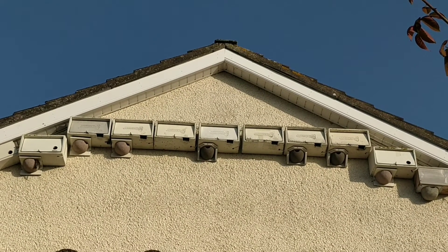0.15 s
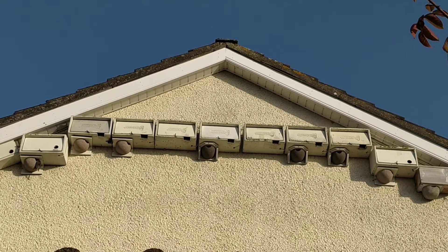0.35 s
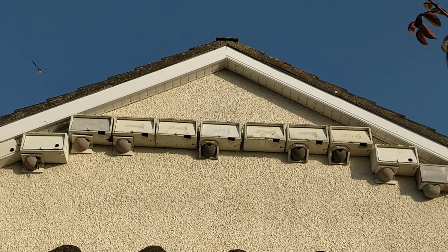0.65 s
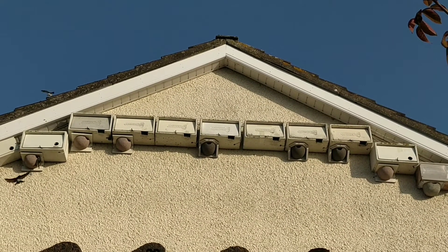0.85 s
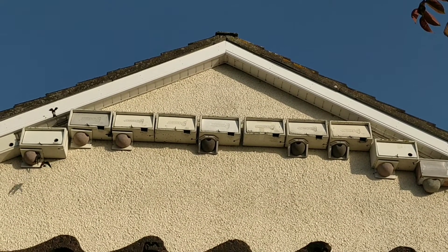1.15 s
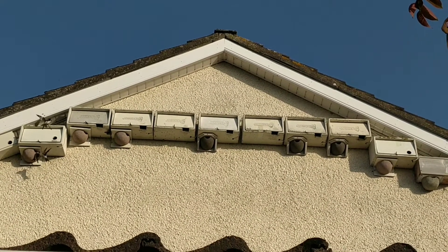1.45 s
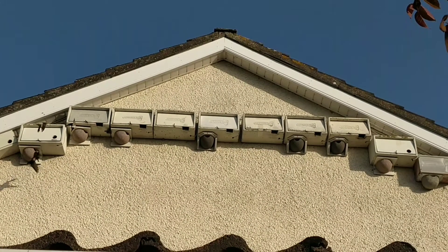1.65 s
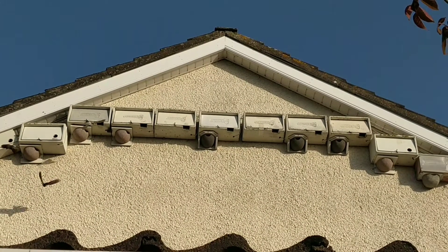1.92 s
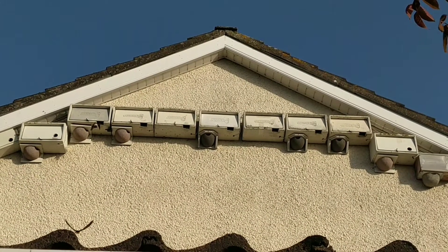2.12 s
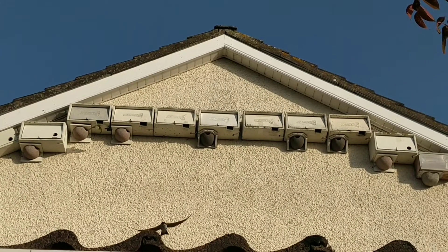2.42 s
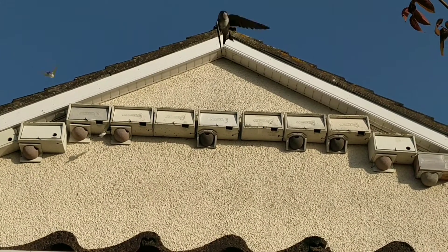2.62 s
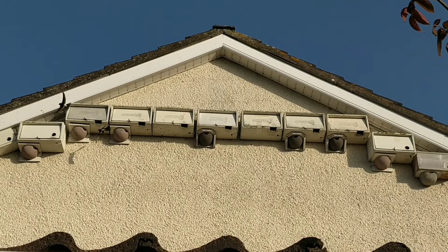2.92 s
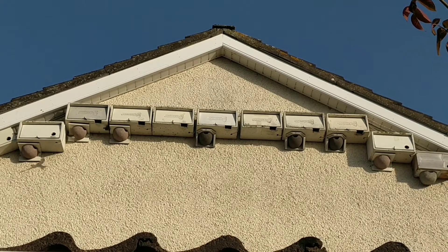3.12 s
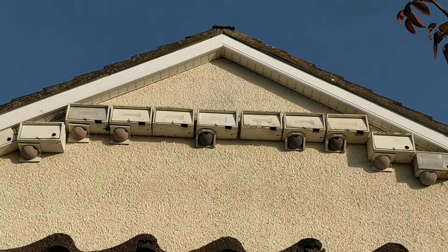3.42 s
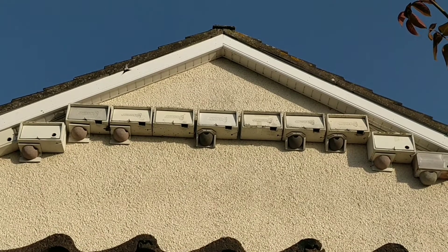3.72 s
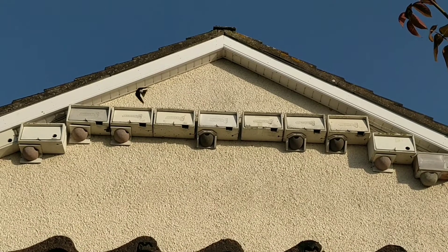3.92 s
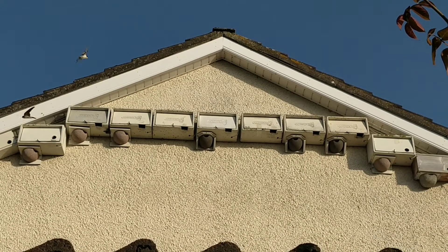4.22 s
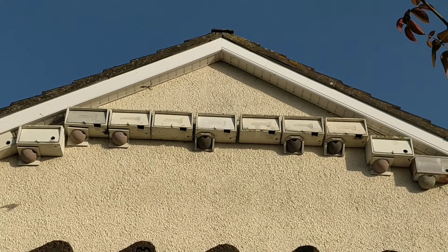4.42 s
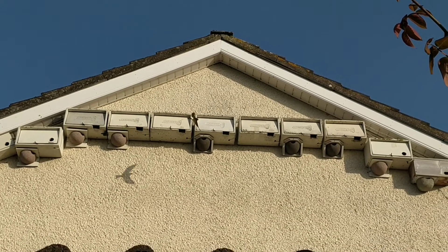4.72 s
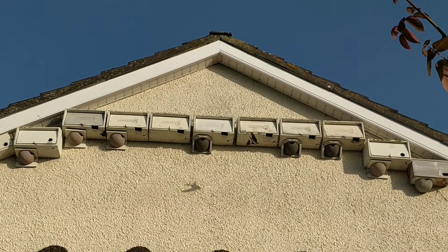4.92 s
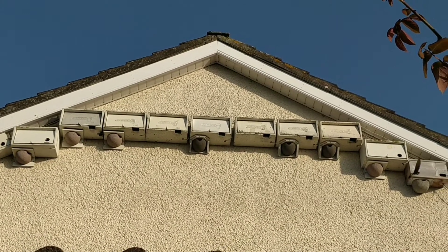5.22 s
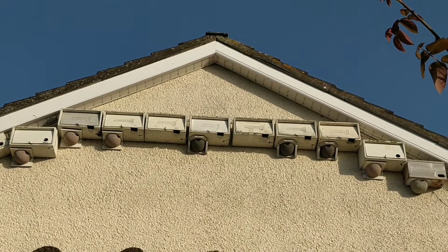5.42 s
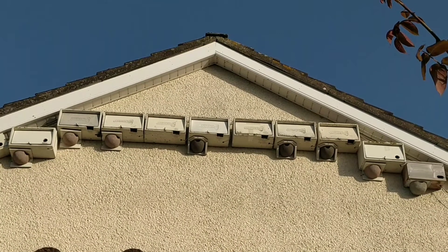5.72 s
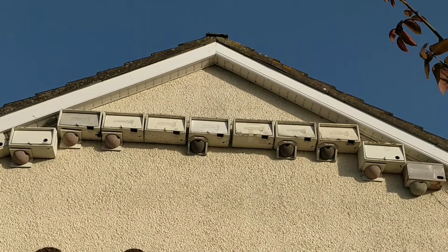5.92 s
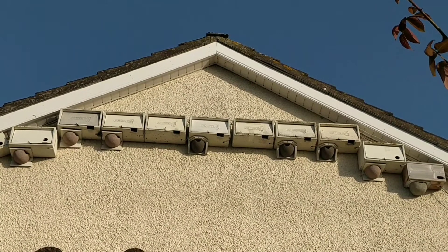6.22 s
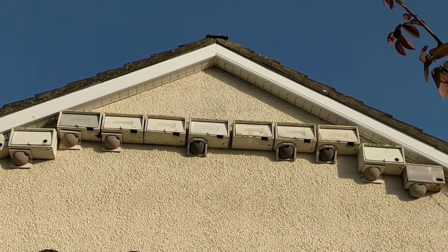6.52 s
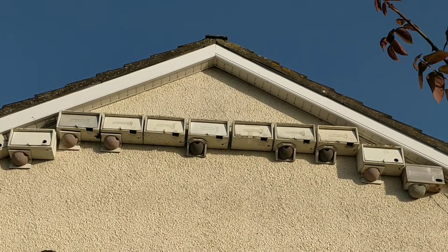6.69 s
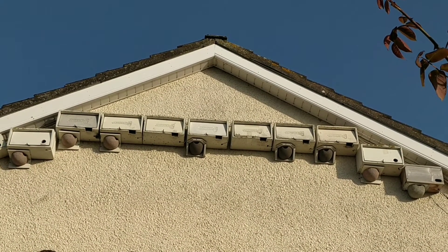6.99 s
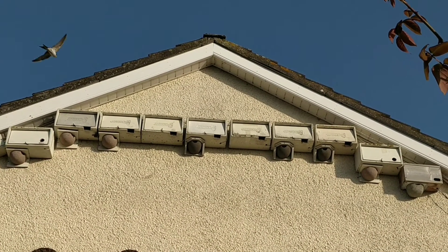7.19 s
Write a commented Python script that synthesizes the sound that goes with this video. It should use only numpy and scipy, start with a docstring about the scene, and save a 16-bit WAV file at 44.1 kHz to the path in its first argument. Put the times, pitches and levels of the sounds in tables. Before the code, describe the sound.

A house wall with nest boxes under the eaves, heard outdoors in stereo from a moderate distance, with short reflections from soffit, roof and yard. From 0 s martins give dry, rattling twitters: fast gritty chirps sweeping up from about 2.5 to 5 kHz, in pairs or small groups roughly 20 ms apart. Activity softens around 0.45-0.7 s and 1.0-1.25 s, then becomes dense and loud from 1.3 to 2.55 s. A quieter, rougher rattle runs about 2.75-3.27 s, with a brighter burst near 3.3-3.4 s. Strong pairs return from 3.77 to 5.0 s. Calls then weaken and scatter until 6.5 s, with a pause and a few faint chirps after 7.1 s. From about 5.4 s come very faint distant whistles, thin high lisps and low hoarse calls. Low traffic rumble persists, its tyre roar swelling slightly near 3.4 s, with a faint unsteady engine drone.

```python
"""House martins twitter round their nest boxes under the eaves: calls of one to three fast upward sweeps
about 22 ms apart, each a gliding tone with overtones and roughness, echoed by soffit, roof and yard.
A small bird lisps high up and farther birds call now and then, all as gliding near-sine notes.
Behind them distant traffic rumbles as coloured noise, and a far engine drones as a wavering sine."""
import sys
import numpy as np
from scipy import signal
from scipy.fft import rfft, irfft
from scipy.io import wavfile
from scipy.ndimage import uniform_filter1d

SR = 44100
rng = np.random.default_rng(int(sys.argv[2]) if len(sys.argv) > 2 else 0)


def store_wav(level_fs):
    """Save 16-bit WAV to argv[1]."""
    pcm = np.round(np.clip(np.atleast_2d(level_fs), -1, 1) * 32767)
    wavfile.write(sys.argv[1], SR, pcm.T.astype(np.int16))


N = 324115
TIME = np.arange(N) / SR
LEFT_RIGHT = np.array([[1], [-1]]) / 2  # shares a difference equally between the two ports
YARD_T60_S = 0.35

# lags of the first echoes; the wall and roof lags vary at random from sweep to sweep
SOFFIT_S = .003
WALL_S, WALL_RANGE_S = .000784, .001
ROOF_S, ROOF_RANGE_S = .013, .012
# treble gained while an open beak points at the microphone, or lost as the bird turns away:
# (time [s], gain reached at 13 kHz [dB])
BEAK_FACING = [(0, -0.5), (1.5, 0.5), (2.4, -1.5), (2.53, 8), (2.96, 3), (3.01, -4), (3.26, -4),
               (3.28, 20.5), (3.40, 16), (3.45, 0), (3.76, 4.5), (4.45, 4), (4.7, 5), (4.9, 2), (5.3, -6),
               (7.35, -10)]
# notches cut by a surface close to the microphone: (frequency [Hz], gain [dB])
SURFACE_NOTCHES = [(2100, 0), (2520, 2), (2820, -10.5), (3200, 4), (3490, -5.5), (3780, 3.5), (4060, -8.5),
                   (4340, -1), (4750, 0.5), (5200, -1), (5600, 3.5), (6100, -1.5), (6500, 2)]
# tint of the yard's echoes: (frequency [Hz], gain [dB])
YARD_TINT = [(2300, 6.0), (3700, 3.5), (4600, 2.0), (5400, -2.5), (7000, 5.5), (12000, 4.0)]


def martins(near_db=-35, fade_db=18, soffit_db=-14, wall_db=-15, roof_db=-14, yard_db=-7.5,
            far_loss_db=2.5, far_echo_db=2.5, aside_ms=.05, count=3):
    """Direct-to-reverberant ratio: faint birds and those off to the side arrive more as echo."""
    direct = np.zeros((2, N))
    sends = np.zeros((count, 2, N))
    place = 0
    for s, voice, db, lag_ms, opens in syllables():
        # successive calls take turns among a few places on the wall
        place = (place + int(opens)) % count
        roof_chance, wall_chance = rng.random(2)
        heard = at_ports(voice, lag_ms) * undb(db)
        far = np.clip((near_db - db) / fade_db, 0, 1) + (lag_ms < aside_ms)
        # only the treble is beamed, and the echoes do without this change
        treble_db = np.interp(s, *np.transpose(BEAK_FACING))
        beamed = colour(heard, [(5800, 0), (13000, treble_db)])
        add(direct, beamed * undb(-far_loss_db * far), s)
        add(direct, heard * undb(soffit_db), s + SOFFIT_S)
        # the wall just behind the bird answers sooner and breaks up the sweep
        add(direct, heard * undb(wall_db), s + WALL_S + WALL_RANGE_S * wall_chance)
        # the roof in front returns a distinct copy
        add(direct, heard * undb(roof_db), s + ROOF_S + ROOF_RANGE_S * roof_chance)
        # the yard's echoes reach both ports unshaded
        unshaded = at_ports(voice, lag_ms, shade_db_per_ms=0)
        add(sends[place], unshaded * undb(db + far_echo_db * far), s)
    echo = sum(yard(send, YARD_T60_S, spread=0.81) for send in sends)
    return colour(direct, SURFACE_NOTCHES) + undb(yard_db) * colour(echo, YARD_TINT)


# a syllable opens a new call after a pause longer than this, or if its foot is below this pitch
PAUSE_S, OPENING_FOOT_HZ = .03, 2650
# martin sweeps: (time at the top [s], level before losses and echoes [dB], top pitch [Hz], foot pitch [Hz],
# length of the climb [ms], rasp before offsets [dB], strength of the low climb [dB], lead of the left port [ms])
MARTIN_SWEEPS = [(0.008, -37.5, 5280, 2930, 4.9, -28, -4, 0.091),
                 (0.07, -33.5, 5270, 2587, 6.1, -28, -8.5, 0.098),
                 (0.091, -33.5, 5140, 2795, 7.5, -38, -7, 0.11),
                 (0.1768, -51, 5300, 2770, 4.6, -24, -2, 0.093),
                 (0.1925, -52, 5070, 2790, 8.1, -26, -7, 0.11),
                 (0.2205, -40, 4970, 1943, 6.8, -16, 9, 0.091),
                 (0.2416, -35, 5200, 2836, 6.5, -29, -3, 0.1),
                 (0.308, -38, 5280, 2970, 5.5, -26, 10, 0.091), (0.3304, -38, 5110, 2830, 5.1, -26, 3, 0.1),
                 (0.4496, -51, 4960, 2520, 5.8, -21, 3, 0.08), (0.472, -50.5, 5200, 2836, 7, -16, 3, 0.1),
                 (0.583, -57.0, 5420, 2790, 6.8, -34, -14, 0.094),
                 (0.602, -53, 5310, 2380, 4.9, -22, -6, 0.1),
                 (0.6625, -53, 5260, 2380, 4.1, -28, -8, 0.098),
                 (0.682, -52.5, 5320, 2770, 7.9, -26, -7.5, 0.11),
                 (0.82, -41.5, 5240, 2390, 5.7, -25, -11, 0.11),
                 (0.8431, -42.5, 5100, 2843, 7.9, -26, -3, 0.12),
                 (0.9107, -45.5, 5300, 2970, 5.2, -33, -3, 0.097),
                 (0.932, -41, 5040, 2785, 6.8, -27, -3, 0.11),
                 (0.9938, -57.5, 5260, 2820, 5.5, -12, -14, 0.14),
                 (1.02, -68, 4870, 2800, 7, -20, -11, 0.086), (1.1197, -58, 4630, 3020, 4.8, -10, 18, 0.1),
                 (1.141, -64, 5400, 2800, 6, -4, 7, 0.12), (1.2362, -57, 4800, 2680, 5.9, -21, 3, 0.11),
                 (1.26, -55.5, 5160, 2800, 6.3, -8, -14, 0.12),
                 (1.312, -47, 4780, 2090, 3.7, -20, 2, 0.093),
                 (1.325, -36, 5130, 2444, 6.3, -29, -9, 0.096), (1.337, -39, 5030, 3000, 4.1, -20, 0, 0.11),
                 (1.3447, -37, 5190, 2770, 6.1, -22, -0.5, 0.094),
                 (1.358, -41.5, 4720, 3120, 5.3, -21, 10, 0.1),
                 (1.381, -38.5, 5090, 2720, 6.2, -26, 6, 0.11),
                 (1.4025, -37.5, 5160, 2840, 6, -18, 18, 0.11),
                 (1.4651, -39, 4500, 1894, 5.5, -16, 15, 0.1),
                 (1.4859, -38.5, 4900, 2588, 5.5, -20, 9, 0.13),
                 (1.4904, -36.5, 5370, 2807, 6.1, -25, -7, 0.1),
                 (1.5105, -37.5, 5130, 2780, 6.3, -22, 1, 0.11),
                 (1.583, -33.5, 5260, 2480, 5.8, -16, -1.5, 0.1),
                 (1.6012, -31, 5390, 2820, 5.1, -19.5, 2.5, 0.11),
                 (1.665, -33.0, 5450, 2480, 5.6, -27, -12, 0.11),
                 (1.6857, -34, 5330, 2786, 5.4, -21, -17, 0.11),
                 (1.704, -44.5, 5300, 2820, 5.7, -5, 10, 0.11),
                 (1.783, -37.5, 5240, 2160, 5, -25, -11, 0.11),
                 (1.8037, -36, 5350, 2794, 6.2, -22, -10, 0.11),
                 (1.8415, -47, 5230, 3100, 5.1, -13, 5, 0.11),
                 (1.864, -48.5, 5320, 2810, 8.3, -17, -2, 0.1),
                 (1.8878, -47, 5400, 2820, 8.2, -20, -10, 0.108),
                 (1.9049, -35.5, 5170, 2480, 6.1, -33, -6.5, 0.1),
                 (1.927, -34, 5150, 2760, 5.5, -30, -2.5, 0.11),
                 (1.955, -39.5, 5350, 3100, 6.4, -23, -18, 0.11),
                 (1.9804, -40, 5220, 2820, 7.7, -35, -9, 0.11),
                 (1.995, -37.5, 5330, 2873, 6.3, -22, 8, 0.11),
                 (2.0172, -35, 5180, 2815, 6.46, -31, 0, 0.097),
                 (2.058, -35, 5320, 2710, 5.5, -21, -10, 0.11),
                 (2.0847, -33.5, 5380, 2800, 7.4, -26, -9, 0.11),
                 (2.153, -32.5, 5380, 2487, 5.7, -29, -18.5, 0.11),
                 (2.173, -31, 5340, 2780, 7.2, -23, -9, 0.11),
                 (2.2563, -36, 5010, 2492, 5.8, -29, -2, 0.095),
                 (2.277, -36, 5270, 2770, 7.9, -22.5, 2, 0.086),
                 (2.3433, -36, 5240, 2897, 4.8, -24, 6, 0.1),
                 (2.3664, -36.5, 5180, 2803, 6.9, -19.5, 0.5, 0.11),
                 (2.393, -44, 5180, 2820, 6.8, -21.5, -10, 0.108),
                 (2.52, -32, 5350, 2193, 7, -28.5, -19, 0.11),
                 (2.5394, -31, 5310, 2820, 6.3, -27, -17, 0.11),
                 (2.76, -46, 5190, 2614, 4.4, -17.5, 4.5, 0.1),
                 (2.779, -48.5, 5270, 2790, 8.1, -11, 1, 0.12),
                 (2.862, -44.5, 5550, 2700, 4.5, -18, 4, 0.11), (2.883, -44, 4630, 2400, 4.8, -7, 14, 0.12),
                 (2.904, -50, 4650, 3120, 8.3, -1, -5, 0.11),
                 (2.9225, -47.5, 5090, 2775, 5.8, -1, -4, 0.11),
                 (2.9423, -52, 5500, 2800, 6.2, -6, -10, 0.11), (2.954, -59, 5270, 2790, 6, -6, -12, 0.11),
                 (3.0224, -48.5, 5120, 3500, 4.1, -19, -6, 0.015),
                 (3.0426, -43, 5050, 3700, 7.1, -17, -6, 0.015),
                 (3.0652, -42.5, 4920, 3700, 7.7, -21, -5, 0.015),
                 (3.088, -51, 5230, 3700, 6.5, -20, -15, 0.015),
                 (3.107, -46, 4860, 3500, 5.1, -13, -5, 0.015),
                 (3.128, -46, 5200, 2834, 6.6, -12, 9, 0.015),
                 (3.1456, -44, 5070, 3600, 6.8, -18, -4, 0.015),
                 (3.1658, -37.5, 4740, 3700, 4.55, -27, -13, 0.014),
                 (3.19, -50, 5040, 3600, 7.2, -17, -3, 0.015),
                 (3.2094, -53.5, 5350, 2800, 8.4, -20, -16, 0.015),
                 (3.2226, -44, 4950, 2990, 4.7, -14, 9, 0.015),
                 (3.2422, -48, 4920, 3600, 9, -26, -15, 0.015),
                 (3.2627, -43, 4870, 3600, 5.7, -32, -8, 0.015),
                 (3.297, -42.5, 5200, 3120, 4.5, -19.5, -4, 0.11),
                 (3.3177, -34.5, 5420, 2770, 7.4, -27, -12, 0.11),
                 (3.384, -38.5, 5370, 3080, 5, -20, -0.5, 0.1),
                 (3.4092, -38.0, 5440, 2807, 10.3, -18, 0.5, 0.12),
                 (3.4943, -53, 5140, 2300, 5, -25, -1, 0.1), (3.566, -48, 4850, 2400, 4.8, -12, 1, 0.098),
                 (3.588, -51.5, 4900, 2760, 5.9, -8, 12, 0.11), (3.659, -59, 4760, 2750, 6, -21, 18, 0.096),
                 (3.6998, -43.5, 4760, 2410, 6.2, -7.5, 5, 0.11),
                 (3.7164, -41, 5090, 2800, 7.4, -20, 5, 0.11), (3.7325, -60, 5260, 2790, 8, -17, 1, 0.12),
                 (3.771, -33.5, 5190, 2387, 4.8, -24, -8, 0.11),
                 (3.791, -33, 5200, 2790, 8.1, -37, -7, 0.12),
                 (3.8545, -37.5, 5300, 2830, 5.8, -29, -1, 0.1),
                 (3.875, -34.5, 5150, 2850, 6.1, -29, -2.5, 0.12),
                 (3.9556, -33, 5250, 2800, 5.6, -30, -8.5, 0.11),
                 (3.9778, -33, 5180, 2797, 7.02, -28, -5, 0.102),
                 (4.1119, -36.5, 5330, 2173, 5, -22, -15, 0.11),
                 (4.1317, -34.5, 5230, 2785, 7.4, -22, -10, 0.11),
                 (4.24, -52, 4870, 3050, 5.1, -17, 14, 0.11), (4.2614, -48, 5080, 2794, 7.1, -9, 16, 0.11),
                 (4.3677, -52, 4860, 2810, 11.4, 6, 5, 0.12), (4.394, -53, 4680, 2940, 5.2, -9, 17, 0.11),
                 (4.414, -48.0, 4970, 2780, 8.6, -31, 13, 0.11),
                 (4.4414, -32.5, 5220, 2296, 6.8, -20, -12.5, 0.12),
                 (4.4616, -34.5, 5300, 2783, 7.1, -25, -6, 0.12),
                 (4.5344, -35, 5280, 2496, 5.7, -25, -14, 0.12),
                 (4.554, -31, 5300, 2774, 6.8, -24.5, -6, 0.12),
                 (4.6026, -33.5, 5220, 2424, 6.1, -28.5, -7.5, 0.11),
                 (4.6235, -33.5, 5190, 2797, 7.1, -35, -3.5, 0.11),
                 (4.69, -37, 5250, 2710, 5.6, -37, 4, 0.098), (4.7115, -34, 5120, 2810, 6.4, -30, -2, 0.11),
                 (4.8463, -45.5, 5430, 3100, 7.5, -16, -8, 0.11),
                 (4.8869, -34.5, 5220, 2200, 4.2, -23.5, -24, 0.12),
                 (4.9073, -34, 5290, 2850, 6.9, -26, -10, 0.12),
                 (4.9837, -38.5, 5140, 2484, 6.8, -25, -11.5, 0.11),
                 (5.0044, -35, 5210, 2807, 8.8, -24, -13, 0.12),
                 (5.1395, -50.5, 5120, 2290, 3.6, -21, 5, 0.11),
                 (5.1755, -51, 5170, 2390, 5.2, -30, 0, 0.12),
                 (5.193, -55.5, 5130, 2800, 6.5, -22, -7, 0.1),
                 (5.309, -49.5, 5000, 2456, 3.7, -19, 1, 0.13), (5.33, -52, 5200, 2810, 5.8, -22, -1, 0.11),
                 (5.3535, -48.5, 4940, 3170, 8.9, -7, -11, 0.12),
                 (5.3762, -38.5, 5410, 2826, 7.4, -23, -19, 0.12),
                 (5.3954, -41.5, 5280, 2800, 7.6, -24, -6, 0.13),
                 (5.448, -49, 5460, 3010, 4.7, -26, -14, 0.13),
                 (5.47, -41.0, 5230, 2810, 5.5, -20, -8, 0.12),
                 (5.8172, -47, 5100, 2364, 4.1, -15, -15, 0.12),
                 (5.8398, -40, 5340, 2760, 6.9, -20, -4, 0.11),
                 (5.876, -47, 5210, 3130, 6.9, -22, -4, 0.11), (5.923, -44, 5430, 2870, 4.9, -37, -5, 0.11),
                 (5.9441, -42.5, 5050, 2790, 8.4, -30, -5, 0.12),
                 (6.219, -58, 5300, 2800, 4.4, -26, -14, 0.11), (6.2348, -71, 5130, 2800, 5, -16, -6, 0.13),
                 (6.3257, -51, 5420, 2435, 3.8, -16, -8, 0.1),
                 (6.3567, -48.5, 5270, 2790, 8.6, -17, -6, 0.12),
                 (6.3734, -51, 5000, 2776, 5.4, -19, -9, 0.12),
                 (6.394, -55.0, 5300, 2770, 6.7, -22, -7, 0.1),
                 (6.4298, -53, 4900, 2180, 7.2, -30, -3, 0.12),
                 (6.4494, -50.5, 5330, 2805, 6, -24, -6, 0.11), (6.518, -58, 5370, 2395, 5, -23, -12, 0.11),
                 (6.537, -56, 5360, 2850, 8.2, -29, -16, 0.11),
                 (7.146, -60, 5250, 2340, 5.3, -16, -11, 0.065),
                 (7.191, -55.5, 5120, 2430, 6.2, -22, -11, 0.11),
                 (7.205, -65, 5050, 2786, 6, -21, -7, 0.12), (7.262, -57, 4900, 3500, 6.1, -21, -17, 0.12),
                 (7.28, -53, 4840, 3600, 8.6, -29, -6, 0.12)]


def syllables():
    """Temporal grouping: the sweeps in turn, each marked if a pause or a low foot makes it open a call."""
    before = -1
    for s, db, top_hz, foot_hz, rise_ms, rasp_db, climb_db, lag_ms in MARTIN_SWEEPS:
        opens = s - before > PAUSE_S or foot_hz < OPENING_FOOT_HZ
        before = s
        voice, start = syllable(top_hz, foot_hz, rise_ms / 1000, opens, rasp_db, climb_db)
        yield s + start, voice, db, lag_ms, opens


GRIT = .5  # share of the roughness left at the top of a sweep
LOOSE = .28  # roughness that even a clear syllable has on its low climb
SHAKE = .015  # extra pitch shake at the foot, as a share
# the voice slackens on the crest of a later syllable and snaps back in the plunge
CREST_DIP_DB, PLUNGE_DB = -8.5, -0.5
# the weaker its low climb, the shriller a call: climb strength where this begins and is complete
MELLOW_DB, SHRILL_DB = -2, -17
# a shrill call opens on the octave of its foot, which meets the beak's resonance
OCTAVE_DB = -14
# throat and beak response of a martin: (frequency [Hz], gain [dB])
THROAT_RESPONSE = [(1500, -13.5), (2300, -5.5), (3100, -0.5), (3700, 5), (4400, 3), (5250, 3), (5700, 1.5),
                   (6200, -1.5), (7100, 0), (8200, -28), (10300, -10.5), (11200, -13), (12200, -4),
                   (13200, -17), (15000, -22)]


def syllable(top_hz, foot_hz, rise, opens, rasp_db, climb_db, attack=0.0016, release=0.0019,
             overtone_db=9, grit_db=7, scrape_db=-1.0, start_db=-5.0, flutter_db=3):
    """Source and filter: uneven membranes settle towards a pure tone, coloured by throat and beak."""
    t = np.arange(-800, 500) / SR
    hz, slack, hold, crest = pitch_arch(t, top_hz, foot_hz, rise, opens)
    shaken_hz = hz * (1 + (0.017 + SHAKE * slack) * wander(len(t), 900))
    phase = 2 * np.pi * np.cumsum(shaken_hz) / SR
    fade_in = np.clip((t + rise + hold) / attack, 0, 1)
    fade_out = np.clip((crest + PLUNGE_S - t) / release, 0, 1)

    # the beak favours or muffles the middle pitches; the very lowest notes cannot be pushed hard
    above_lowest = np.clip((hz - 2200) / 800, 0, 1)
    below_top = np.clip((top_hz - hz) / 1400, 0, 1)
    pushed_db = np.minimum(climb_db, climb_db * above_lowest) * below_top
    dip_db = CREST_DIP_DB * (not opens) * np.exp(-((t - crest + 0.00052) / 0.0011) ** 2)
    closing_db = dip_db + PLUNGE_DB * (t > crest)
    effort = undb(pushed_db + closing_db + start_db * slack ** 4 + flutter_db * wander(len(t), 600))

    # uneven clapping of the membranes gives overtones and noise
    buzz = np.minimum(undb(rasp_db + overtone_db), 1)
    claps = phase + 0.064 * wander(len(t), 2700)
    second = (0.49 + 0.091 * slack ** 4) * np.sin(2 * claps)
    overtones = buzz * (second + 0.34 * np.sin(3 * claps))
    shrill = opens * np.clip((MELLOW_DB - climb_db) / (MELLOW_DB - SHRILL_DB), 0, 1)
    octave = shrill * undb(OCTAVE_DB) * slack ** 6 * np.sin(2 * claps)
    settling = GRIT + (1 - GRIT) * slack
    scrape = undb(scrape_db) * buzz * settling * rng.standard_normal(len(t))
    grit = np.minimum(undb(rasp_db + grit_db), .4) * settling + LOOSE * slack
    tone = effort * np.sin(phase) * (1 + grit * wander(len(t), 3600))

    voice = colour(fade_in * fade_out * (tone + overtones + octave + scrape), THROAT_RESPONSE)
    return voice / rms(voice[(t > -.011) & (t < .004)]), t[0]


# time on the foot before the climb and at the top; the opening syllable lingers on its foot
OPENING_HOLD_S, HOLD_S = 0.0049, 0.0011
OPENING_CREST_S, CREST_S = .0009, .0026  # before scatter
SAG_HZ_PER_S = 55100  # while it lingers the pitch sags onto the foot
PLUNGE_HZ_PER_S, PLUNGE_S = 800000, .0027  # the pitch plunges as the note closes
# no two sweeps are alike: scatter of the bend of the climb and of the time on the crest
BEND_SCATTER, CREST_SCATTER = .13, .15
# the climb starts steeply, hesitates and eases into the top, for opening and later syllables:
# (share of its bent time [0-1], share of its pitch range [0-1])
OPENING_CLIMB_CURVE = [(0, 0), (.12, .22), (.27, .5), (.5, .64), (.72, .87), (1, 1)]
LATER_CLIMB_CURVE = [(0, 0), (.13, .22), (.3, .53), (.48, .72), (.7, .79), (.87, .94), (1, 1)]


def pitch_arch(t, top_hz, foot_hz, rise, opens):
    """Frequency modulation: a low foot, a steep climb that hesitates, a short crest and a plunge."""
    if opens:
        hold, crest, climb = OPENING_HOLD_S, OPENING_CREST_S, OPENING_CLIMB_CURVE
    else:
        hold, crest, climb = HOLD_S, CREST_S, LATER_CLIMB_CURVE
    crest_chance, bend_chance = rng.standard_normal(2)
    crest = crest * np.exp(CREST_SCATTER * crest_chance)
    progress = np.clip(1 + t / rise, 0, 1) ** np.exp(BEND_SCATTER * bend_chance)
    climbed = np.interp(progress, *np.transpose(climb))
    slack = 1 - uniform_filter1d(climbed, size=24)  # 1 at the foot, 0 at the top
    early = np.clip(-t - rise, 0, hold)
    late = np.clip(t - crest, 0, PLUNGE_S)
    hz = top_hz + (foot_hz - top_hz) * slack + SAG_HZ_PER_S * early - PLUNGE_HZ_PER_S * late
    return hz, slack, hold, crest


def at_ports(voice, lag_ms, shade_db_per_ms=50):
    """Interaural-style cues: the bearing sets the lag between the ports and the shading of one of them."""
    turn = 2 * np.pi * np.fft.rfftfreq(len(voice), 1 / SR) * lag_ms / 1000
    off_axis_ms = lag_ms - .104
    lagged = irfft(rfft(voice) * np.exp(1j * LEFT_RIGHT * turn), len(voice))
    return lagged * undb(LEFT_RIGHT * shade_db_per_ms * off_axis_ms)


# the yard's echoes set in a little late and build up
YARD_DELAY_S, YARD_BUILD_S = .0025, .004


def yard(x, t60, spread, clump_db=6):
    """Exponential reverberant decay: echoes of walls and roofs in clumps, partly alike in both ports."""
    t = TIME[:SR]
    build = 1 - np.exp(-np.maximum(t - YARD_DELAY_S, 0) / YARD_BUILD_S)
    decay = np.exp(-np.log(1000) * t / t60)
    clumps = undb(clump_db * np.tanh(wander(SR, 216)))
    mid, side = rng.standard_normal((2, SR)) * build * decay * clumps
    response = np.array([mid + spread * side, mid - spread * side])
    response = response / rms(response) / np.sqrt(SR)
    return signal.fftconvolve(np.broadcast_to(x, (2, N)), response, axes=1)[:, :N]


# the three note tables share the columns
# (time [s], length [s], start pitch [Hz], end pitch [Hz], level before echo gain [dB])
# thin, mostly falling lisps
LISP_NOTES = [(.625, 0.022, 7000, 6440, -68), (.765, 0.029, 7200, 7150, -71),
              (4.765, .018, 7160, 7050, -69), (5.715, 0.027, 7050, 5900, -71),
              (5.765, 0.035, 7500, 6150, -63), (5.945, 0.043, 6600, 6780, -59.5),
              (6.012, 0.022, 6930, 6450, -57.5), (6.9, 0.016, 6870, 6340, -66.5),
              (7.025, 0.042, 7300, 6420, -57.5)]
# hoarse calls of farther birds
FAR_CALL_NOTES = [(3.205, 0.027, 2530, 1790, -62), (5.85, 0.07, 1416, 1380, -68),
                  (6.3, 0.065, 1385, 1300, -59), (6.46, 0.12, 1330, 1290, -67),
                  (6.67, 0.062, 1520, 1535, -64), (6.88, 0.075, 1535, 1550, -64),
                  (7.1, 0.059, 1520, 1504, -66), (7.28, .06, 1480, 1570, -66)]
# clear held notes of a far songbird
FAR_WHISTLE_NOTES = [(5.38, .22, 2090, 2120, -75), (5.49, .17, 2850, 2860, -77),
                     (5.64, 0.3, 2976, 2990, -76), (5.87, 0.14, 2020, 1950, -68),
                     (6.07, 0.041, 2810, 2740, -70), (6.22, 0.13, 2140, 2180, -73)]


def other_birds(lisp_echo_db=-4, call_echo_db=1.5, song_echo_db=0):
    """Distance by reverberation: lisps arrive direct with echo, far calls and whistles as echo alone."""
    lisps = whistles(LISP_NOTES, waver=0.022, waver_hz=562)
    calls = whistles(FAR_CALL_NOTES, waver=0.027, waver_hz=201.6)
    song = whistles(FAR_WHISTLE_NOTES, waver=.007, waver_hz=60)
    far = undb(call_echo_db) * calls + undb(song_echo_db) * song
    lisp_echo = undb(lisp_echo_db) * yard(lisps, YARD_T60_S, spread=1.0)
    return lisps + lisp_echo + yard(far, 0.34, spread=0.62)


def whistles(notes, waver, waver_hz):
    """Frequency-modulated sinusoids: gliding near-sine notes whose pitch wavers by a small share."""
    out = np.zeros(N)
    for s, length, start_hz, end_hz, db in notes:
        size = max(int(length * SR), 64)
        hz = np.linspace(start_hz, end_hz, size) * (1 + waver * wander(size, waver_hz))
        swell = np.sqrt(2 * np.hanning(size))
        add(out, undb(db) * swell * np.sin(2 * np.pi * np.cumsum(hz) / SR), s)
    return out


AIR_DB = -50.5  # overall level before the roar swells
# spectral shape of distant traffic and open air: (frequency [Hz], relative density [dB])
AIR_SPECTRUM = [(20, -2), (34, 2.5), (70, -5), (110, -13.5), (300, -15), (430, -17.5), (800, -16.5),
                (1100, -24), (1700, -31.5), (4500, -35), (6500, -46), (9000, -46.5), (14500, -44),
                (16000, -40)]
# slow swell of the tyre roar, used relative to its mean and scaled by roar_swing: (time [s], roar [dB])
TYRE_ROAR = [(0, -58.5), (.8, -62), (2.6, -60.5), (3.45, -55), (3.8, -59), (7.35, -60.5)]
# likeness of left and right: (frequency [Hz], correlation [0-1])
PORT_LIKENESS = [(30, 0.9), (120, 0.96), (280, 0.89), (600, 0.65), (1400, 0), (15000, 0.08)]


def traffic(roar_swing=0.82):
    """Diffuse-field coherence: a steady rumble, alike in both ports in the bass, under swelling tyre roar."""
    alike = np.clip(along(PORT_LIKENESS, N), 0, 1)
    noise = rfft(rng.standard_normal((2, N)))
    mid, side = irfft(noise * np.sqrt([1 + alike, 1 - alike]), N)
    air = colour(np.array([mid + side, mid - side]), AIR_SPECTRUM)
    air = air * undb(AIR_DB) / rms(air)
    s, roar_db = np.transpose(TYRE_ROAR)
    swell_db = roar_swing * np.interp(TIME, s, roar_db - roar_db.mean())
    roar = colour(air, [(250, -34), (450, -2.0), (950, 0), (1500, -67)])
    return air + roar * (undb(swell_db) - 1)


ENGINE_WAVER = .015  # wavering of the far engine's speed, as a share
# drone of a far engine: (time [s], level before engine_db [dB])
ENGINE_LEVEL = [(0, -48), (.6, -61), (3.45, -59), (3.65, -47.5), (4.8, -50), (5.1, -65), (5.6, -51),
                (6, -61.5), (7.35, -53)]


def drone(engine_hz=53.9, engine_db=-3.5, hum_hz=182, hum_db=-69):
    """Slow amplitude and frequency modulation: an unevenly throbbing engine under a faint wavering hum."""
    engine_pitch = engine_hz * (1 + ENGINE_WAVER * wander(N, 10))
    engine = np.sin(2 * np.pi * np.cumsum(engine_pitch) / SR) * (1 + 0.098 * wander(N, 18))
    hum_pitch = hum_hz * (1 + 0.0189 * wander(N, 15))
    hum = np.sin(2 * np.pi * np.cumsum(hum_pitch) / SR) * (1 + 0.67 * wander(N, 8))
    level_db = engine_db + np.interp(TIME, *np.transpose(ENGINE_LEVEL))
    return np.sqrt(2) * (engine * undb(level_db) + hum * undb(hum_db))


def undb(db):
    """Logarithmic level: decibels to gain."""
    return 10 ** (np.asarray(db) / 20)


def rms(x):
    """Mean power: root mean square, kept above zero."""
    return np.sqrt(np.mean(x ** 2)) + 1e-12


def along(points, size):
    """Logarithmic frequency: a (frequency [Hz], value) table read at the bins of a transform."""
    hz, value = np.transpose(points)
    return np.interp(np.log(np.fft.rfftfreq(size, 1 / SR) + 1), np.log(hz), value)


def colour(x, points):
    """Linear filtering: each frequency is scaled by a (frequency [Hz], gain [dB]) table."""
    size = x.shape[-1]
    return irfft(rfft(x) * undb(along(points, size)), size)


def wander(size, hz):
    """Band-limited noise: smooth chance with unit spread, from about hz random points a second."""
    x = signal.resample(rng.standard_normal(int(size * hz / SR) + 4), size)
    return x / rms(x)


def add(out, x, s):
    """Superposition: mix x into out from time s."""
    start = int(round(s * SR))
    a, b = max(start, 0), min(start + x.shape[-1], N)
    if b > a:
        out[..., a:b] += x[..., a - start:b - start]


def scene():
    """Superposition of sources: birds over the traffic and the engine."""
    return martins() + other_birds() + traffic() + drone()


TOP_HZ = 15700
# balance of the ports: (frequency [Hz], left minus right [dB])
PORT_LEVEL_DIFFERENCE = [(30, -0.5), (1200, -0.4), (2600, 1), (3050, 0.5), (3500, -.5), (4200, -5.5),
                         (5200, -0.5), (6000, -1.5), (6800, -3), (7400, 0.5), (9000, 1), (11000, -1),
                         (12000, 5.5), (15000, 1.5)]
# phase bent between the ports by the body that holds them: (frequency [Hz], lead of the left [rad])
PORT_PHASE_LEAD = [(1600, -0.011), (2500, -0.36), (3300, -0.63), (3750, -0.78), (4150, 0.09),
                   (5000, -0.072), (5500, -0.077), (6050, -0.91), (6500, 0.9), (7300, 0.43), (8600, 1.25),
                   (11000, 0.66), (12200, 1.2)]


def record(dry):
    """Transfer functions: the two microphone ports differ in colour and phase; a low-pass cuts the top."""
    balance = undb(LEFT_RIGHT * along(PORT_LEVEL_DIFFERENCE, N))
    bend = np.exp(1j * LEFT_RIGHT * along(PORT_PHASE_LEAD, N))
    low_pass = signal.ellip(10, .2, 70, TOP_HZ, fs=SR, output="sos")
    return signal.sosfilt(low_pass, irfft(rfft(dry) * balance * bend, N))


dry = scene()
out = record(dry)
store_wav(out)
```